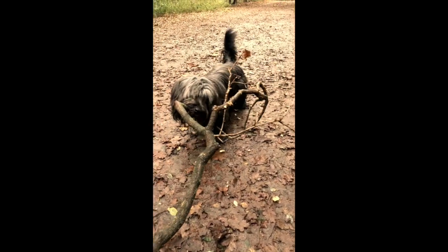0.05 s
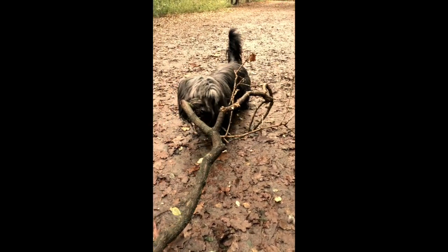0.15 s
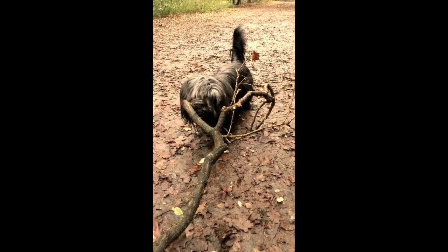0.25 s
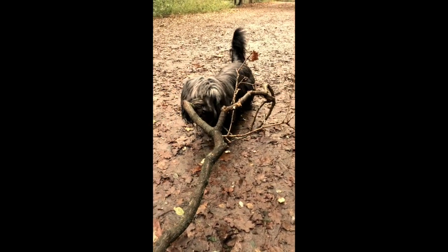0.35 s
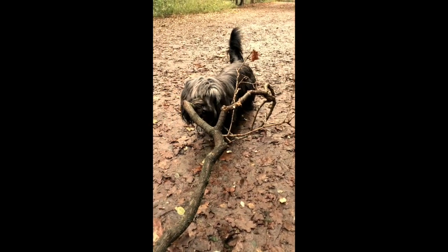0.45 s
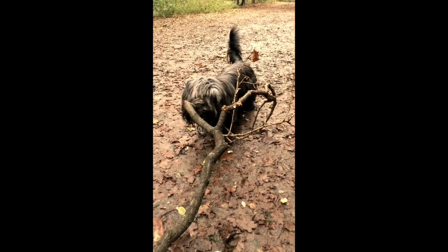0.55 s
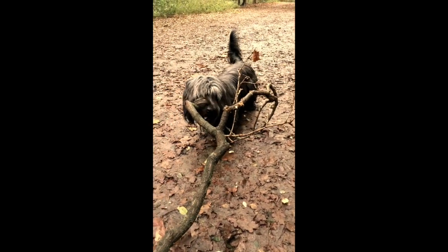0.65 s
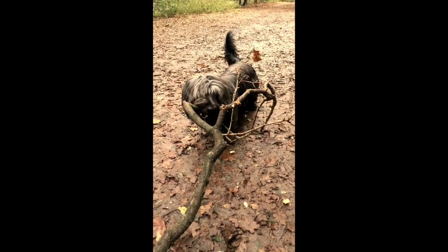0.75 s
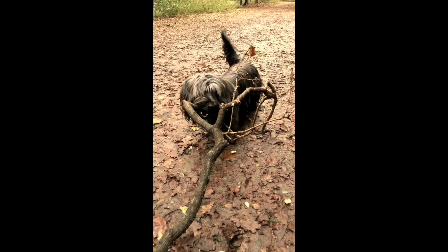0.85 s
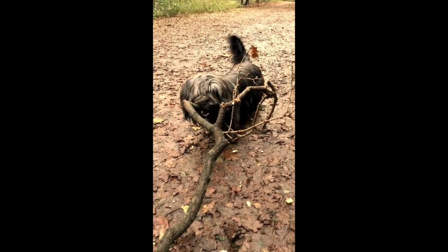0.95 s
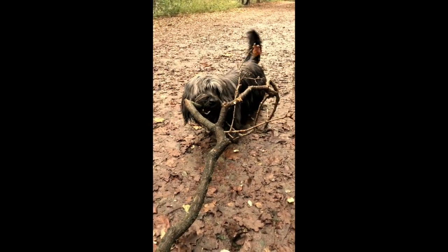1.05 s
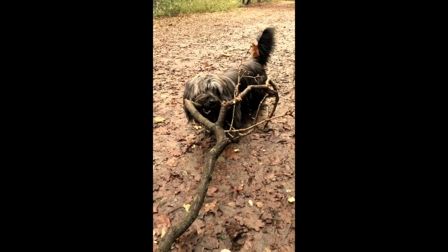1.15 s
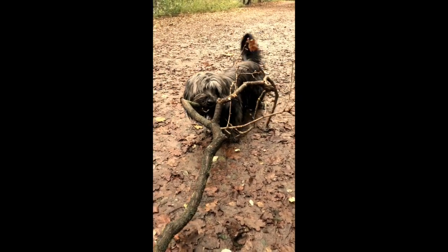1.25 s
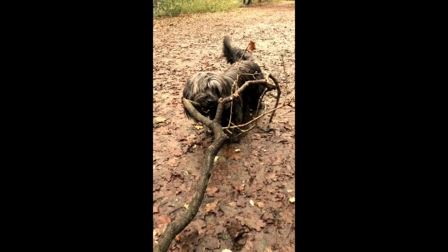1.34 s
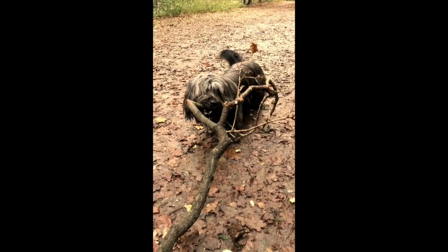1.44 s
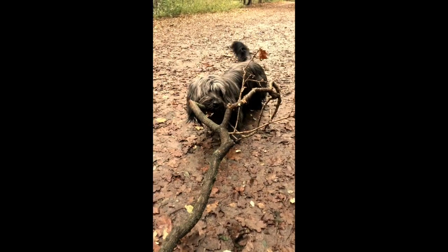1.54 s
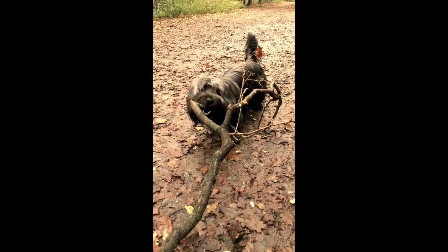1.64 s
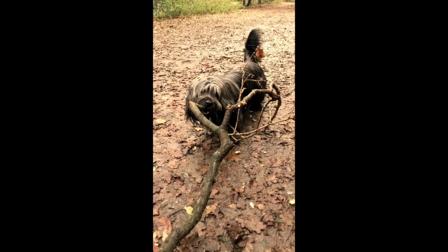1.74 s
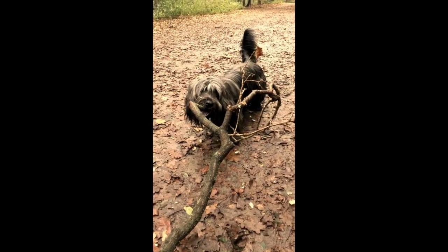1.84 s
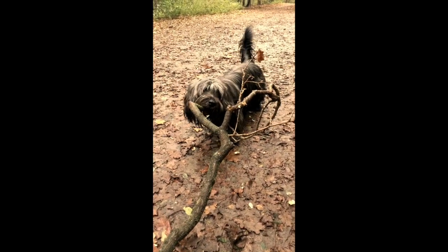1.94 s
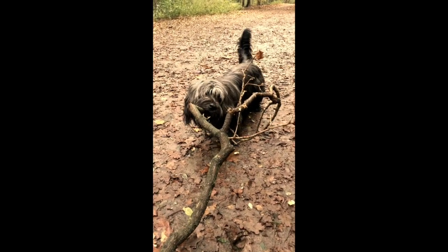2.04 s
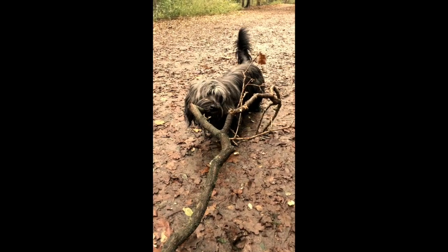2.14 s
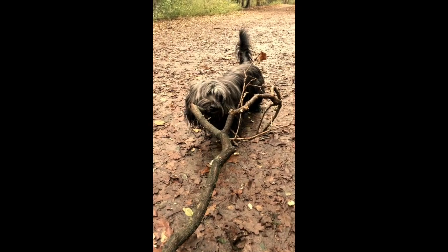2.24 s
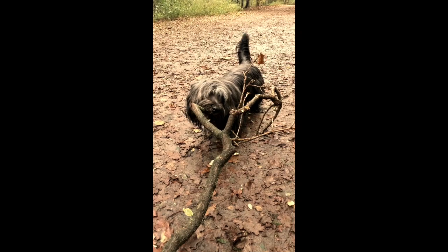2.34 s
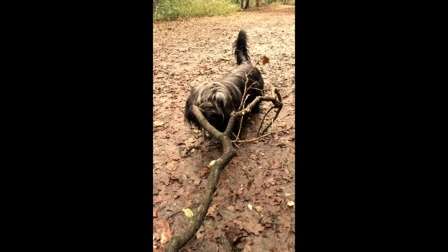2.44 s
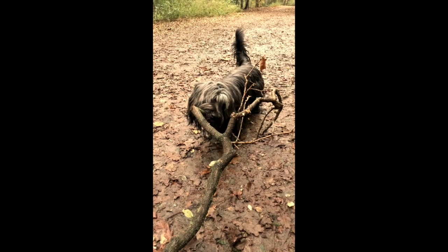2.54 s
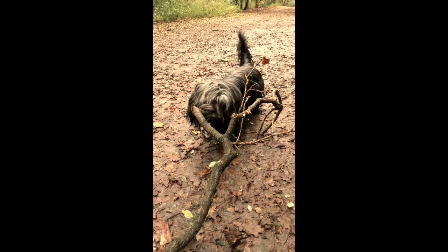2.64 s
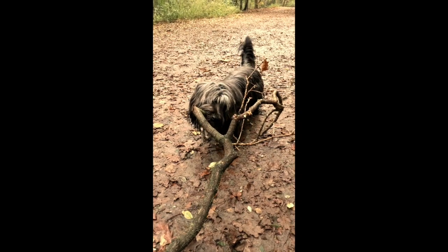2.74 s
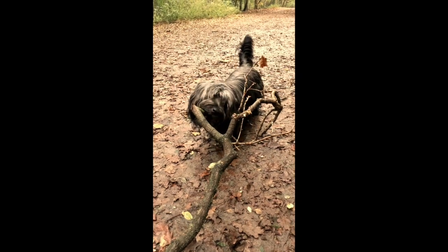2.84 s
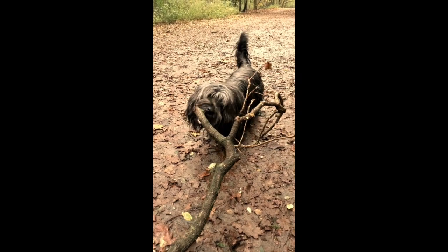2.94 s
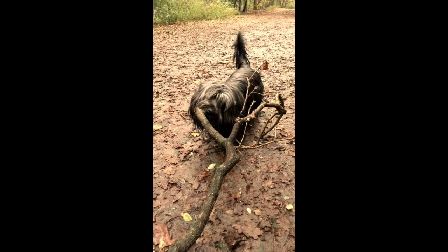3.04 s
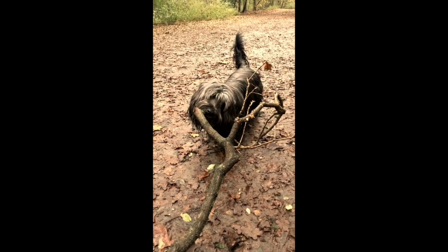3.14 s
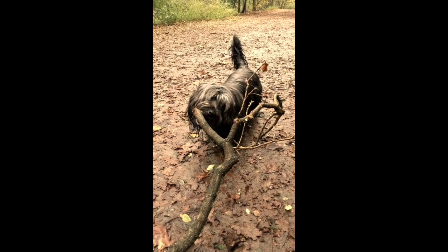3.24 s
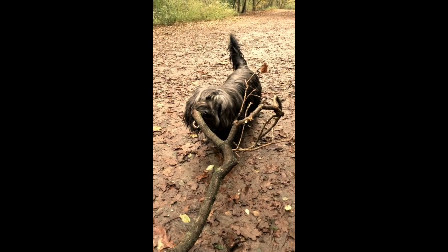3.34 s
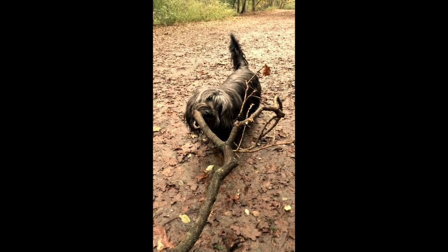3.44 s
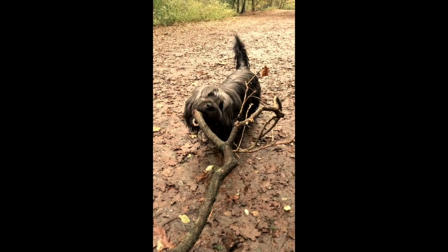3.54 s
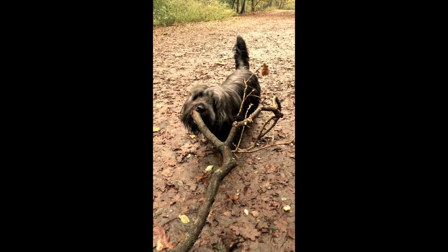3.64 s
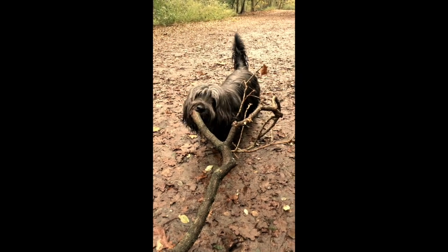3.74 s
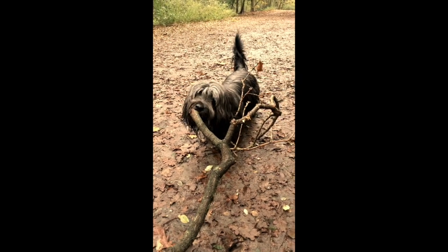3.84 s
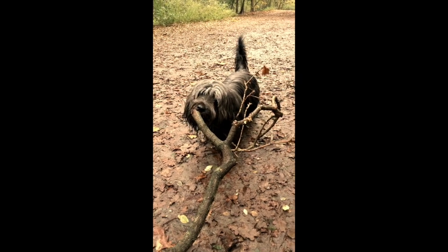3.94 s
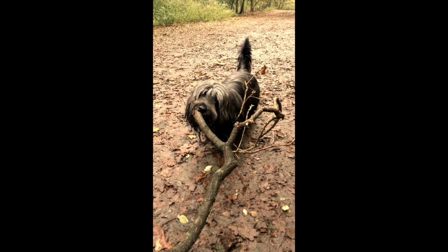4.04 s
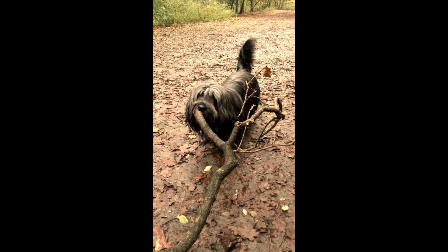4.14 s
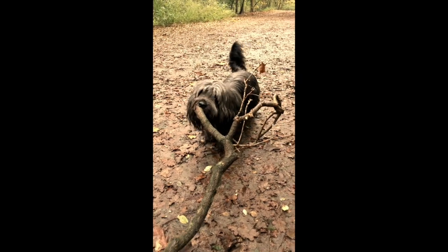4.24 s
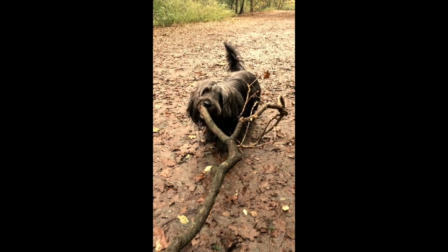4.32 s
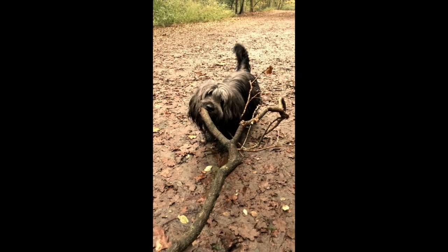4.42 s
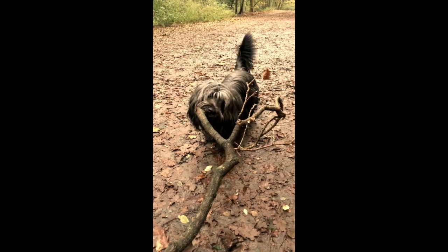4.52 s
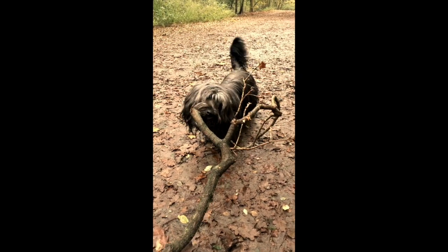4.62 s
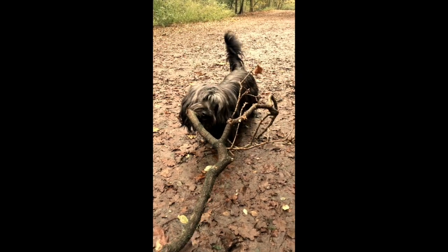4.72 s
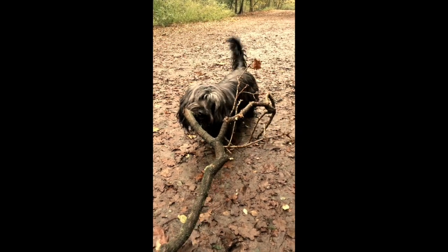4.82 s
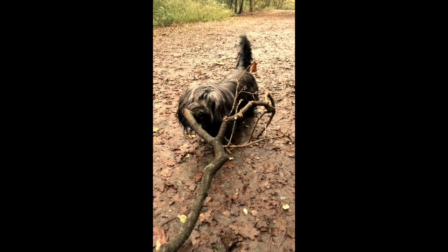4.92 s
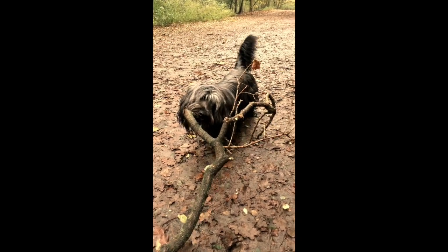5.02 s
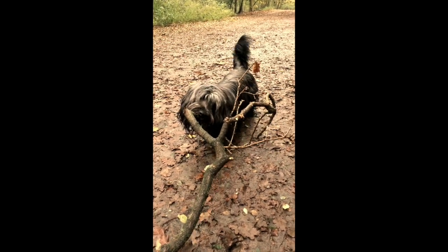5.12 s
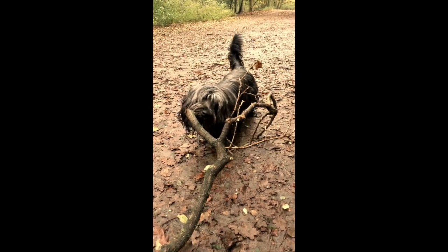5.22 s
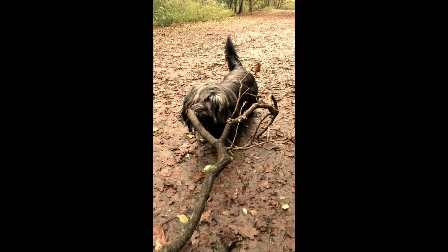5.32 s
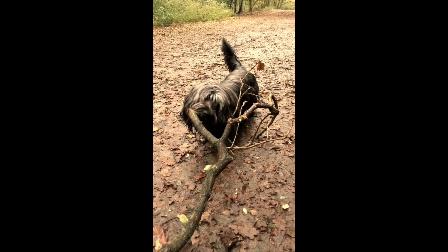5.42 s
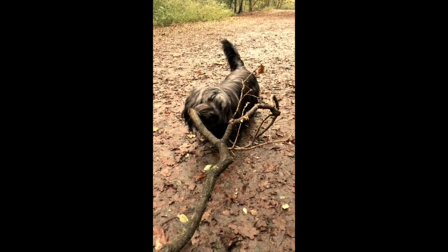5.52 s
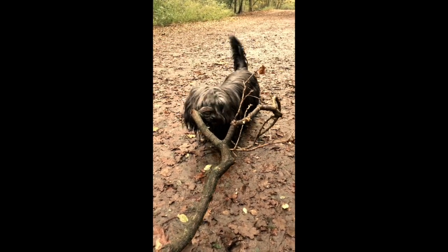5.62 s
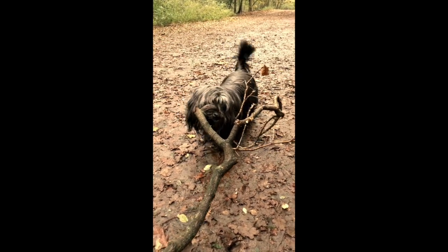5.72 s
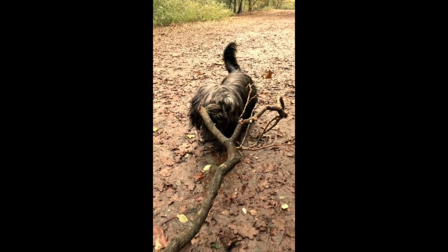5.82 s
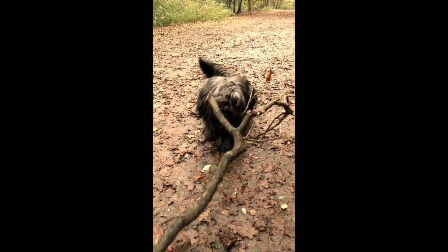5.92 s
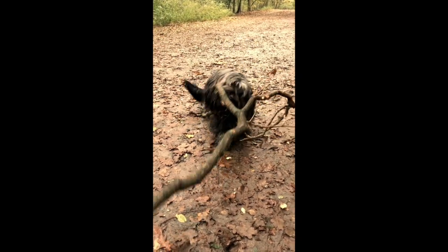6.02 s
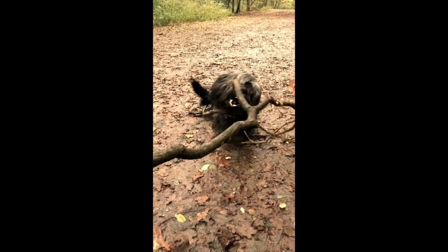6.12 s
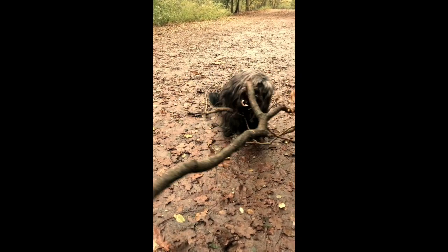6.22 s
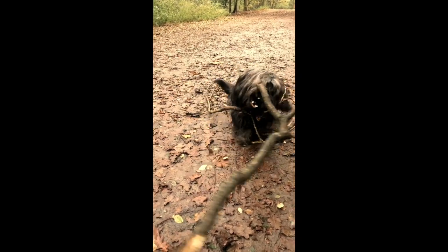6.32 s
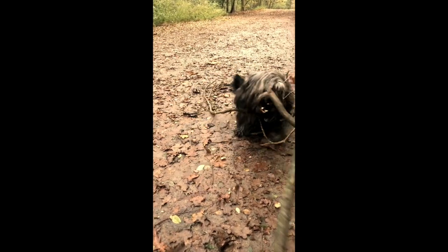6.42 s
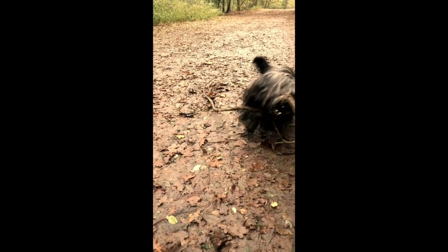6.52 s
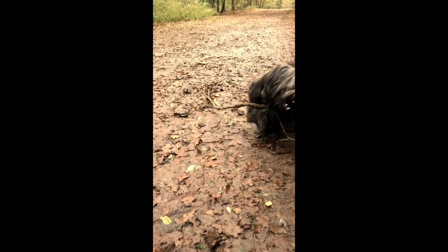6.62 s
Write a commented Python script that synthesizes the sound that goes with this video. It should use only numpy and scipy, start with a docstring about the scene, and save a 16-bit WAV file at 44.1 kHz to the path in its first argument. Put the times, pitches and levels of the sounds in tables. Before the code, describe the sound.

Close, dry outdoor sound on a leafy forest floor, with a faint hush, low rumble and very thin tree echo. From 0 s a small dog growls through its teeth in short, slow-pulsed pushes, with croaky flaps around 0.2-0.5 s. From 0.8 to 1.9 s the growl grows stronger and rises in pitch, then sinks back. From 2 to 2.8 s it is rougher and raspier; from 2.9 to 4.4 s it is more closed and humming. Small leaf rustles accompany the tugs, with soft paw thuds, the heaviest near 4.2 s. Dull wood knocks cluster at 4.5-4.8 s as the raspy snarl returns, swelling to 5.5 s. At about 5.7 s one loud bark leaps up and falls quickly. Harder, louder growling follows, peaking around 6.2-6.4 s, over a long leafy drag, a snap near 6.0 s and a sharp double snap near 6.6 s.

```python
"""On a leafy forest floor, close to the microphone, a small dog tugs a big branch and growls through its teeth.
Slow throat pulses hum, rattle and rasp, with loud single flaps; one bark bursts out, then harder growling.
Noise crackles make the leaves, damped modes the knocking wood and thudding paws, short noise the twig snaps.
A low rumble swells with the growl; a faint forest hush and a thin echo from the trees lie behind."""
import sys
import numpy as np
from scipy import signal
from scipy.fft import rfft, irfft, next_fast_len
from scipy.io import wavfile
from scipy.ndimage import uniform_filter1d, map_coordinates

SR = 44100
rng = np.random.default_rng(int(sys.argv[2]) if len(sys.argv) > 2 else 0)


def log_audio(samples):
    """Write samples as a 16-bit WAV file to the path given in sys.argv[1]."""
    # one column per channel
    frames = np.atleast_2d(samples).T
    # limit to full scale, then quantise
    limited = np.clip(frames, -1, 1)
    pcm = np.round(limited * 32767).astype(np.int16)
    wavfile.write(sys.argv[1], SR, pcm)


N = 294147  # samples

# Throat colour for each mouth shape in the growl. Each row: frequency in Hz, relative gain in dB.
SLACK_THROAT = [(150, -6), (420, -7), (570, -27), (720, 1.5), (950, -2), (1150, 2), (1550, 0.5),
                (1700, -13.5), (2150, -3), (2700, -38), (8000, -70)]
BARED_THROAT = [(150, -27), (400, 5), (590, -14.5), (820, 5), (1000, 2.5), (1400, 3.5), (1680, -15),
                (1980, -3), (2450, -11), (2800, -35), (3400, -35), (4200, -35), (8000, -66)]
SNARL_THROAT = [(150, -7.5), (400, 0), (540, -11.5), (780, 6.5), (1130, 3), (1400, 1), (1600, -11.5),
                (2150, -1), (2650, -21), (8000, -38.5)]
CLOSED_THROAT = [(150, -31), (290, -16), (390, 4.5), (540, -21), (790, 5.5), (1050, -9.5), (1350, -24),
                 (1720, -4), (2300, -25), (8000, -49)]
PURSED_THROAT = [(150, -27), (290, -10.5), (400, 3), (500, -9), (620, -2.5), (900, -9), (1400, -22),
                 (1550, -30), (2080, -5.5), (2500, -33), (8000, -45)]
OPEN_THROAT = [(150, -19), (450, -0.5), (560, -17.5), (830, 3.5), (1180, -2), (1520, -22), (1750, -8),
               (2150, -6), (2500, -22), (8000, -47)]
# Air rasping through the teeth. Each row: frequency in Hz, relative gain in dB.
TEETH_COLOUR = [(1500, -13.5), (2700, -11.5), (3150, 5), (3700, 4), (4600, -5.5), (5500, -2), (6400, -5.5),
                (7600, -20.5), (9600, -9), (11000, -20.5), (15000, -17)]
# Pushes of the growl, levels at the crest. Each row: start in seconds, rise in seconds, fall in seconds,
# chest level in dB, throat level in dB, rasp level in dB, slack pitch in Hz, crest pitch in Hz,
# roughness from 0 to 1, mouth resonance in Hz.
PUSHES = [(0, 0.052, 0.0096, -39, -44, -62, 90.2, 97, 0.56, 900),
          (.2, 0.019, .09, -41, -44, -51.5, 59.98, 62.1, .75, 795),
          (.36, 0.098, .16, -42.5, -47, -55, 51.96, 55.9, 0.69, 725),
          (.68, .02, 0.022, -43, -40.5, -48.5, 74.9, 82.13, 0.86, 900),
          (.86, .1, .16, -34.5, -38, -56, 100.1, 125.2, 0.58, 990),
          (1.05, 0.23, 0.3, -35, -36.5, -53.5, 129.8, 174.8, 0.63, 1197),
          (1.6, 0.069, .14, -35, -41.5, -57.5, 75.05, 118, .75, 903.5),
          (2.01, 0.072, 0.049, -68, -41.5, -47.5, 75.95, 80.02, .85, 1110),
          (2.17, .02, 0.063, -44, -50, -57, 72.2, 77.94, 0.79, 1099),
          (2.36, .11, 0.086, -41.5, -42, -52, 72.03, 78, 0.71, 1049),
          (2.825, .025, 0.029, -33.5, -43.5, -58, 70.04, 80.03, .75, 1017),
          (2.93, 0.031, .11, -38.5, -51, -71, 104.4, 119.9, 0.47, 987),
          (3.14, .14, 0.34, -41, -56, -73, 68.04, 79.9, .8, 998),
          (3.71, .05, 0.079, -33, -53, -66, 88, 103.7, 0.31, 836),
          (3.89, .14, .03, -30.5, -46, -75, 78.1, 108.1, 0.34, 819),
          (4.07, .04, .17, -30, -37, -65, 90.05, 122, 0.44, 815),
          (4.33, 0.021, .03, -48, -48.5, -57, 75, 78, .7, 792.7),
          (4.66, 0.049, .14, -37.5, -39, -51, 79.97, 85.75, 0.78, 879),
          (5.0, 0.051, .26, -35, -40, -49.5, 81.93, 85.88, 0.44, 950),
          (5.34, .17, 0.069, -32, -35, -44.5, 86, 101.4, 0.76, 1053),
          (5.83, .22, .1, -38, -36, -58, 106.2, 112, .35, 731),
          (6.08, 0.062, .03, -35, -28, -64, 118, 121.9, .38, 615),
          (6.2, .12, .12, -33, -23.5, -44.5, 115, 122.8, 0.86, 890),
          (6.47, .07, 0.18, -31.5, -28.5, -47, 112.8, 116.9, 0.06, 1002)]
# The grumble between pushes. One row: chest level in dB, throat level in dB, rasp level in dB,
# pitch in Hz, roughness from 0 to 1, mouth resonance in Hz.
IDLE_GRUMBLE = (-58.5, -55, -68.5, 70, 0.86, 950)
# Tugs that sweep the branch through the leaves.
# Each row: start in seconds, length in seconds, rustle level in dB before LEAVES_DB is added.
TUGS = [(0, .06, -65), (0.193, .04, -56.5), (.56, 0.29, -68.5), (0.953, 0.24, -70), (1.299, 0.082, -60.5),
        (1.491, .07, -66.5), (1.731, 0.061, -67.5), (2.0, 0.0098, -61), (2.1, 0.032, -60),
        (2.381, 0.048, -59), (2.52, .03, -60.5), (2.719, 0.021, -66), (2.953, .04, -64),
        (3.413, 0.048, -60.5), (3.639, 0.13, -69), (3.919, 0.041, -71), (4.21, 0.083, -67),
        (4.315, 0.065, -58.5), (4.488, 0.08, -61.5), (4.653, .13, -58.5), (4.87, 0.081, -64),
        (5.029, 0.051, -57), (5.14, 0.12, -62.5), (5.349, .2, -56.5), (5.971, 0.72, -55),
        (6.56, 0.067, -49)]
# Colour of rustling leaves. Each row: frequency in Hz, relative gain in dB.
LEAF_COLOUR = [(300, 11), (1000, 0.5), (2000, 1), (3600, -4), (6000, -4), (9500, -7), (15500, -14)]
# Colour of the low rumble. Each row: frequency in Hz, relative gain in dB.
RUMBLE_COLOUR = [(15, -44), (30, -37), (46, -2.5), (68, -6), (130, -3.5), (300, -23), (1000, -70.5)]
# Colour of the forest hush. Each row: frequency in Hz, relative gain in dB.
HUSH_COLOUR = [(40, -8), (110, -6), (380, -12.5), (550, -19.5), (1000, -14), (1500, -24), (3500, -34.5),
               (15000, -46.5)]
# Croaks, where the throat slows into runs of separate flaps. Each row: start in seconds, length in seconds,
# flap spacing in seconds, first peak in dB before FLAPS_DB and scatter, growth over the run in dB.
CROAKS = [(0.173, .06, .028, -28.5, 3), (0.278, .03, .02, -27, 3), (.351, .045, .018, -22, -2),
          (0.42, .052, .0162, -24.5, -7), (.795, .1, 0.031, -28.5, 5.5), (4.021, 0.092, .041, -26, 7.5),
          (6.06, .04, 0.022, -21, 0), (6.256, .165, 0.032, -14.5, -2)]
# Lone loud flaps of the throat. Each row: time in seconds, peak in dB before FLAPS_DB is added.
LONE_FLAPS = [(1.617, -22.5), (2.181, -27), (2.52, -26.5), (2.825, -31), (3.767, -30.5), (3.904, -29.5),
              (3.98, -32), (4.275, -25), (5.165, -24.5)]
# Ring of the mouth after a flap. Each row: frequency in Hz, level in dB, 60 dB decay in seconds.
FLAP_MODES = [(434, -4.0, 0.021), (780, 2.5, 0.024), (1095, -1.0, 0.021),
              (1460, -7, 0.011), (2000, -9, 0.0093), (3130, -18, 0.011)]
# Twig snaps. Each row: time in seconds, peak in dB before the snap colour.
SNAPS = [(0.2339, -37), (1.9999, -41), (2.7085, -37.5), (3.4513, -37), (4.641, -36), (5.9744, -29),
         (6.5646, -23.5), (6.5767, -23)]
# Colour of a twig snap. Each row: frequency in Hz, gain in dB.
SNAP_COLOUR = [(800, -28), (4000, 2.5), (15000, 0.0)]
# Knocks of the branch. Each row: time in seconds, peak in dB before KNOCKS_DB is added.
KNOCKS = [(4.507, -28.5), (4.517, -20.5), (4.539, -25), (4.707, -23.5), (4.771, -17), (4.816, -24)]
# Modes of the branch. Each row: frequency in Hz, relative level in dB, 60 dB decay in seconds.
WOOD_MODES = [(390, -0.5, .04), (810, 9, 0.03), (891.7, 9.5, 0.028), (1112, -0.5, 0.043), (1740, 3, 0.015),
              (2231, -6, .015)]
# Paws on soft soil. Each row: time in seconds, peak in dB before PAWS_DB is added.
THUDS = [(0.695, -31), (1.63, -23), (2.849, -23.5), (3.154, -25), (3.38, -30), (3.684, -25.5), (4.165, -14),
         (4.779, -19.5), (5.55, -21)]
# Modes of the soil. Each row: frequency in Hz, relative level in dB, 60 dB decay in seconds.
SOIL_MODES = [(56, -3.5, 0.15), (116.8, 7.0, 0.028), (193.9, -25, 0.024)]
# Course of the bark. Each row: time in seconds, pitch in Hz, level in dB,
# roughness held within 0 to 1, jaw opening from 0 to 1.
BARK = [(5.604, 119.8, -50, 0.73, 0), (5.611, 130, -24, 1.05, 0), (5.63, 149.9, -27, 0.82, 0),
        (5.675, 240, -23.5, 0.33, 0.23), (5.686, 293.3, -8.5, .42, 0), (5.72, 438.2, -6.5, 0.04, .8),
        (5.744, 486.2, -8, 0.08, 0.9), (5.758, 457.4, -8, 0, 1), (5.786, 306.2, -15.5, 0.18, 0.76),
        (5.805, 216.8, -25.5, 0.17, 0), (5.835, 161.5, -29.5, .15, 0.12), (5.87, 122, -61, .15, 0.2)]
# Throat colour of the bark, jaws narrow and wide. Each row: frequency in Hz, relative gain in dB.
NARROW_JAW = [(150, -17), (290, -10), (410, -1.5), (540, -22), (700, 3), (860, 5), (1010, -3), (1350, 0.5),
              (1620, -21), (2100, 0.5), (2700, -29), (3150, -11), (3700, -38), (7300, -40), (14000, -57)]
WIDE_JAW = [(150, -32), (460, -16), (680, -2), (950, -7.5), (1380, 4), (1750, -21), (2380, -5.5),
            (2800, -37), (3600, -34.5), (4300, -9.5), (4750, -34), (5300, -14.5), (6000, -66), (14000, -64)]
# Breath of the bark. Each row: frequency in Hz, relative gain in dB.
BREATH_COLOUR = [(1500, -27), (3500, 0), (4200, -3), (6000, 0.5), (8400, 2), (9500, -11.5), (15000, -14)]
# Colour of the echo from the trees. Each row: frequency in Hz, gain in dB.
ECHO_COLOUR = [(100, 15.5), (500, 5), (2000, -7.0), (8000, -13)]

SWELL_DB, ONSET_S, RELEASE_S = 6, 0.018, 0.03  # a push: growth from edge to crest, fade time constants
FLAP_JITTER_S, FLAP_SCATTER_DB = 0.000563, 4.5  # unevenness within croaks
TUG_ATTACK_S, TUG_RELEASE_S = 0.036, 0.025  # leaves gather and settle, time constants
STIR_DB = -76  # leaves stirring between tugs, before LEAVES_DB is added
RUMBLE_DB, RUMBLE_FOLLOW_DB = -49, -6  # rumble at rest, and its share of the chest level
LEAVES_DB, FLAPS_DB, KNOCKS_DB, PAWS_DB = 9.5, -3.5, -0.5, -1.5  # added to the levels in the tables
HUSH_DB, TREES_DB = -50.5, -19.0
TOP_HZ = 15850  # upper band limit


def amp(db):
    """Decibels to gain."""
    return 10 ** (np.asarray(db) / 20)


def unit(x):
    """Scale to rms 1."""
    return x / np.sqrt(np.mean(x ** 2) + 1e-20)


def steady(x, seconds):
    """Hold the running rms near 1."""
    size = max(int(seconds * SR), 8)
    power = uniform_filter1d(uniform_filter1d(x * x, size), size)
    return x / np.sqrt(np.abs(power) + 1e-12)


def curves(rows):
    """One value per sample for each column after the time."""
    s, *cols = np.transpose(rows)
    return [np.interp(np.arange(N) / SR, s, c) for c in cols]


def during(start, end):
    """A soft gate between two times."""
    t = np.arange(N) / SR
    return uniform_filter1d(1. * ((t >= start) & (t <= end)), size=400)


def swell(start, end, attack, release):
    """Gain 1 from start to end, with exponential fades outside."""
    t = np.arange(N) / SR
    before, after = np.minimum(t - start, 0), np.maximum(t - end, 0)
    return np.exp(np.maximum(before / attack - after / release, -20))


def wobble(rate):
    """A smooth random curve, rate knots a second."""
    knots = rng.standard_normal(int(N * rate / SR) + 4)
    return map_coordinates(knots, [np.arange(N) * rate / SR])


def coloured(x, points):
    """Causal minimum-phase filter with the gain of (Hz, dB) points."""
    m = 2 * next_fast_len(N // 2 + 8192)
    hz, db = np.transpose(points)
    gain_db = np.interp(np.log(np.fft.rfftfreq(m, 1 / SR) + 1), np.log(hz), db)
    cepstrum = irfft(np.log(amp(gain_db)))
    cepstrum[1:m // 2] *= 2
    cepstrum[m // 2 + 1:] = 0
    return irfft(rfft(x, m) * np.exp(rfft(cepstrum)))[:N]


def resonance(x, hz, width_hz):
    """A steep resonance whose centre follows a curve; rms 1."""
    turn = np.exp(2j * np.pi * np.cumsum(hz) / SR)
    lowpass = signal.butter(2, width_hz / 2, fs=SR)
    return unit((signal.lfilter(*lowpass, x / turn) * turn).real)


def ring(t, modes, spread):
    """Damped modes, a little different at each blow."""
    out = 0
    for hz, db, t60 in modes:
        decay = amp(db + 2 * rng.standard_normal() - 60 * t / t60)
        out = out + decay * np.sin(2 * np.pi * hz * np.exp(spread * rng.standard_normal()) * t)
    return out * (1 - np.exp(-t / 0.00093))


def hits(rows, shape):
    """A new shape(t) at each (s, peak dB) row."""
    out, t = np.zeros(N + SR), np.arange(SR // 4) / SR
    for s, db in rows:
        wave = shape(t)
        out[round(s * SR):][:len(t)] += amp(db) * wave / np.abs(wave).max()
    return out[:N]


def effort():
    """Pushes swell and slacken, lifting level and pitch together; the strongest dominates the voice."""
    t = np.arange(N) / SR
    weight = np.full(N, 0.01)
    power = amp(IDLE_GRUMBLE[:3])[:, None] ** 2 * np.ones(N)
    voice = np.outer(IDLE_GRUMBLE[3:], weight)
    for start, rise, fall, chest_db, throat_db, rasp_db, slack_hz, crest_hz, rough, mouth_hz in PUSHES:
        end = start + rise + fall
        strain = np.interp(t, [start, start + rise, end], [0, 1, 0])
        push = (swell(start, end, ONSET_S, RELEASE_S) * amp(SWELL_DB * (strain - 1))) ** 2
        power += np.outer(amp([chest_db, throat_db, rasp_db]) ** 2, push)
        voice[0] += push * (slack_hz + strain * (crest_hz - slack_hz))
        voice[1:] += np.outer([rough, mouth_hz], push)
        weight += push
    return np.sqrt(power), voice / weight


def folds(phase, rough, scatter, size_db, rasp):
    """One pulse per cycle; roughness scatters times and sizes and adds a puff of turbulence to each."""
    count = np.arange(1, int(phase[-1]))
    shift, size = rng.standard_normal((len(count), 2)).T
    local = np.interp(count, phase, rough)
    at = np.interp(count + scatter * local * shift, phase, np.arange(N))
    size = amp(size_db * local * np.tanh(size / 2) * 2)
    # split each pulse between its two nearest samples
    whole, part = at.astype(int), at % 1
    early = np.bincount(whole, size * (1 - part), N + 1)
    late = np.bincount(whole + 1, size * part, N + 1)
    pulses = (early + late)[:N]
    puff = signal.lfilter([1], [1, -np.exp(-1 / (SR * 0.0076))], pulses)
    turbulence = steady(puff * rng.standard_normal(N), 0.027)
    share = np.clip(rasp * rough, 0, 0.97)
    return np.sqrt(1 - share) * steady(pulses, 0.038) + np.sqrt(share) * turbulence


def growl(drive, start, end, throat, mouth_db, whistle_db, whistle_hz, octave_db, second_db, rasp):
    """Slow fold cycles hum through the chest, rattle through the throat and rasp between the teeth."""
    (chest, mouth, hiss), (pitch, rough, mouth_hz) = drive
    rough = np.clip(rough, 0, 1)
    phase = np.cumsum(pitch * np.exp(0.13 * rough * wobble(70))) / SR
    hum = np.cos(2 * np.pi * phase) + amp(octave_db) * np.cos(4 * np.pi * phase)
    hum = steady(hum * amp(11.6 * rough * wobble(65)), 0.044)
    # a weaker second pulse falls halfway through each cycle
    source = folds(phase, rough, scatter=0.2, size_db=10.0, rasp=rasp)
    source = source + amp(second_db) * folds(phase + 0.5, rough, scatter=0.2, size_db=8.5, rasp=rasp)
    mouth_ring = resonance(source, mouth_hz * np.exp(0.054 * wobble(12)), width_hz=140)
    rattle = unit(coloured(source, throat)) + amp(mouth_db) * mouth_ring
    # the jet between the teeth pulses less deeply and rings in two wandering gaps
    jet = source + 0.39 * rng.standard_normal(N)
    lips = np.exp(0.03 * wobble(25))
    whistle = resonance(jet, 3220 * lips, width_hz=260)
    whistle = whistle + amp(-2.5) * resonance(jet, whistle_hz * lips, width_hz=700)
    teeth = unit(coloured(jet, TEETH_COLOUR)) + amp(whistle_db) * whistle
    voice = chest * hum + mouth * steady(rattle, 0.057) + hiss * steady(teeth, 0.17)
    return during(start, end) * voice


def growls(drive):
    """The mouth shifts its grip on the branch, and the growl changes colour."""
    return (growl(drive, 0, 0.78, SLACK_THROAT, mouth_db=-18, whistle_db=-9, whistle_hz=5200,
                  octave_db=-9, second_db=-16, rasp=0.89)
            + growl(drive, 0.78, 1.95, BARED_THROAT, mouth_db=-23, whistle_db=-6, whistle_hz=6772,
                    octave_db=-20.0, second_db=-5.5, rasp=0.98)
            + growl(drive, 1.95, 2.87, SNARL_THROAT, mouth_db=-7, whistle_db=2.0, whistle_hz=5697,
                    octave_db=-10.5, second_db=-9.5, rasp=0.89)
            + growl(drive, 2.87, 4.45, CLOSED_THROAT, mouth_db=-1.5, whistle_db=-13, whistle_hz=6706,
                    octave_db=-26.5, second_db=-10, rasp=0.96)
            + growl(drive, 4.45, 5.585, SNARL_THROAT, mouth_db=-12, whistle_db=-5, whistle_hz=5300,
                    octave_db=-7, second_db=-10.5, rasp=0.99)
            + growl(drive, 5.8, 6.18, PURSED_THROAT, mouth_db=-2, whistle_db=-5, whistle_hz=6470,
                    octave_db=4, second_db=-8, rasp=0.54)
            + growl(drive, 6.18, 6.67, OPEN_THROAT, mouth_db=-8.5, whistle_db=4, whistle_hz=6175,
                    octave_db=9, second_db=-2.5, rasp=0.7))


def leaves():
    """Tiny crackles crowd together as each tug sweeps the leaves along."""
    power = amp(STIR_DB) ** 2
    for start, length, db in TUGS:
        power = power + (amp(db) * swell(start, start + length, TUG_ATTACK_S, TUG_RELEASE_S)) ** 2
    crackle = rng.standard_normal(N) * amp(1.6 * wobble(900) + 3.8 * wobble(70))
    return amp(LEAVES_DB) * np.sqrt(power) * unit(coloured(steady(crackle, 0.061), LEAF_COLOUR))


def air(chest):
    """A low rumble that swells with the growl, and the faint hush of the forest."""
    level = np.hypot(amp(RUMBLE_DB), amp(RUMBLE_FOLLOW_DB) * chest)
    rumble = level * unit(coloured(rng.standard_normal(N), RUMBLE_COLOUR))
    hush = unit(coloured(rng.standard_normal(N), HUSH_COLOUR))
    return rumble + amp(HUSH_DB) * hush


def throat_flaps():
    """(s, peak dB) of every flap: the lone ones and the slightly uneven runs."""
    runs = []
    for start, length, spacing, db, growth_db in CROAKS:
        for s in np.arange(0, length, spacing):
            runs.append((start + s, db + growth_db * s / length))
    runs = np.array(runs)
    uneven = rng.standard_normal(runs.shape) * [FLAP_JITTER_S, FLAP_SCATTER_DB]
    return np.vstack([LONE_FLAPS, runs + uneven])


def stall(flaps):
    """The folds stick around each loud flap, and the rattle and rasp dip by up to a quarter."""
    marks = np.zeros(N)
    marks[[round(s * SR) for s, db in flaps]] = 1
    dip = signal.fftconvolve(marks, np.hanning(SR // 28), "same")
    return 1 - 0.25 * np.clip(dip, 0, 1)


def flap(t):
    """Loose throat tissue slaps once and rings the mouth briefly."""
    return ring(t, FLAP_MODES, spread=0.06)


def snap(t):
    """A snapping twig lets go a burst of noise that dies within hundredths of a second."""
    return amp(-60 * t / 0.019) * rng.standard_normal(len(t))


def knock(t):
    """Damp wood rings dully under a short noisy contact."""
    contact = amp(-60 * t / 0.015) * rng.standard_normal(len(t))
    return ring(t, WOOD_MODES, spread=0.027) + 0.098 * contact


def branch():
    """Ticks of snapping twigs and dull knocks of damp wood."""
    return coloured(hits(SNAPS, snap), SNAP_COLOUR) + amp(KNOCKS_DB) * hits(KNOCKS, knock)


def paws():
    """Each stamp is one low, quickly damped push on the soil."""
    return amp(PAWS_DB) * hits(THUDS, lambda t: ring(t, SOIL_MODES, spread=0.041))


def bark():
    """A rough lead-in tightens into a clear arch of pitch as the jaws open, then falls back."""
    pitch, db, rough, jaw = curves(BARK)
    rough, jaw = np.clip(rough, 0, 1), np.clip(jaw, 0, 1)
    phase = np.cumsum(pitch * np.exp(0.0046 * wobble(200))) / SR
    source = folds(phase, rough, scatter=0.1, size_db=4, rasp=0.8)
    voice = (1 - jaw) * coloured(source, NARROW_JAW) + jaw * coloured(source, WIDE_JAW)
    voice = steady(voice, 0.0029)
    breath = unit(coloured(rng.standard_normal(N), BREATH_COLOUR))
    puffs = np.sqrt(jaw) * breath * (1 + np.cos(2 * np.pi * phase))  # air escapes once a cycle
    return during(BARK[0][0], BARK[-1][0]) * amp(db) * (voice + amp(-22.5) * puffs)


def trees(x):
    """Trunks scatter a thin, dull echo: a short dense tail over a fainter long one."""
    t = np.arange(SR) / SR
    decay = amp(-60 * t / 0.15) + amp(-24.0 - 60 * t / 4.0)
    tail = rng.standard_normal(SR) * decay * (t > 0.012)  # nothing returns in the first 12 ms
    echo = signal.fftconvolve(x, tail / np.linalg.norm(tail))[:N]
    return coloured(echo, ECHO_COLOUR)


def scene():
    """Dog, branch and ground, close by among the trees."""
    (chest, throat, rasp), voice = effort()
    flaps = throat_flaps()
    free = stall(flaps)
    drive = ((chest, throat * free, rasp * free), voice)
    dog = growls(drive) + amp(FLAPS_DB) * hits(flaps, flap) + bark()
    near = dog + leaves() + branch() + paws()
    return (near + amp(TREES_DB) * trees(near) + air(chest))[None]


def record(dry):
    """The microphone sheds the deepest bass and rounds peaks near full scale; its band ends at TOP_HZ."""
    thin = signal.lfilter(*signal.butter(3, 36, "high", fs=SR), dry)
    rounded = thin / (1 + np.abs(thin) ** 8) ** (1 / 8)
    m = next_fast_len(N + 8192)
    band = np.fft.rfftfreq(m, 1 / SR) < TOP_HZ
    return irfft(rfft(rounded, m) * band, m)[..., :N]


dry = scene()
out = record(dry)
log_audio(out)
```